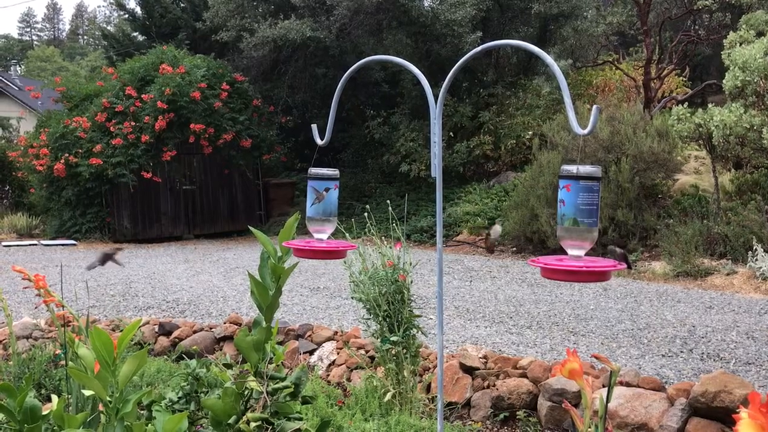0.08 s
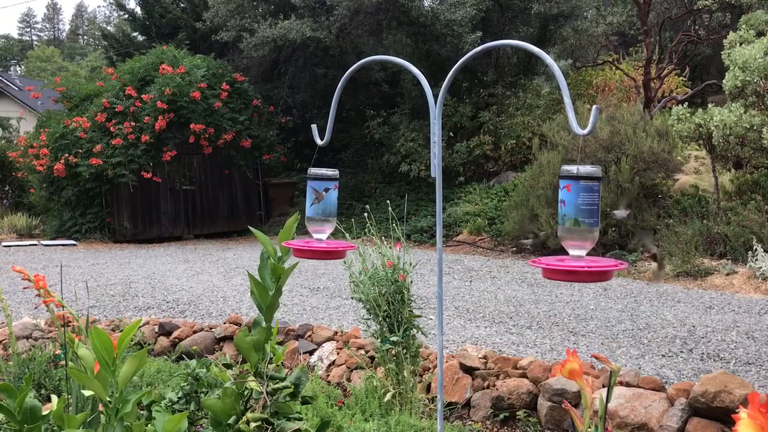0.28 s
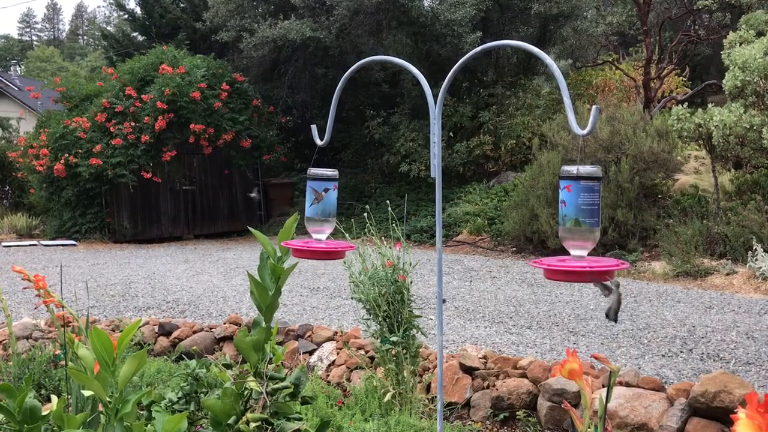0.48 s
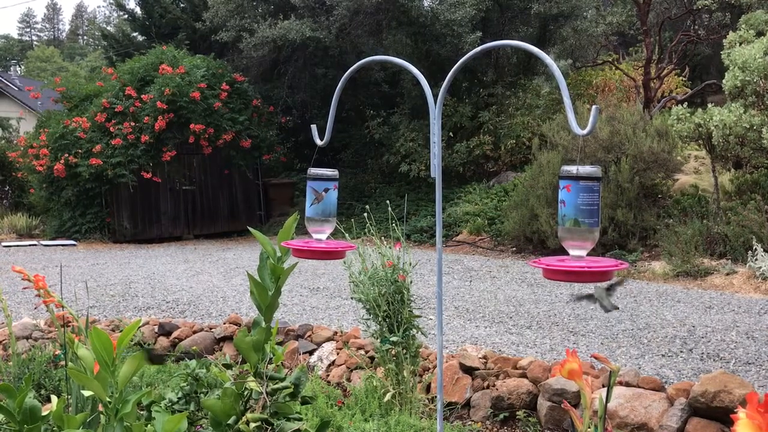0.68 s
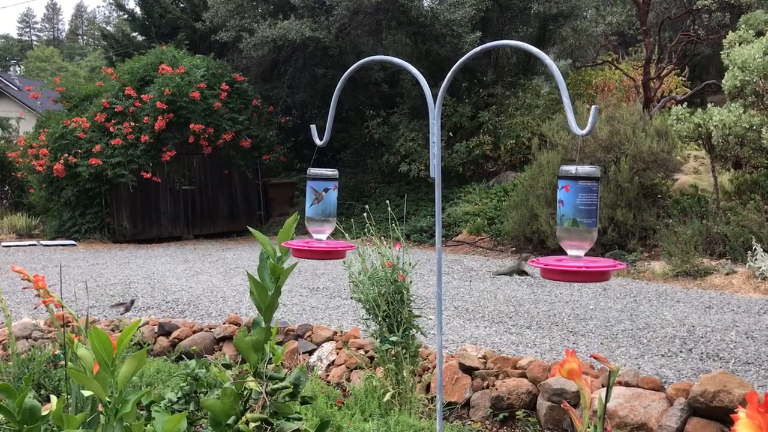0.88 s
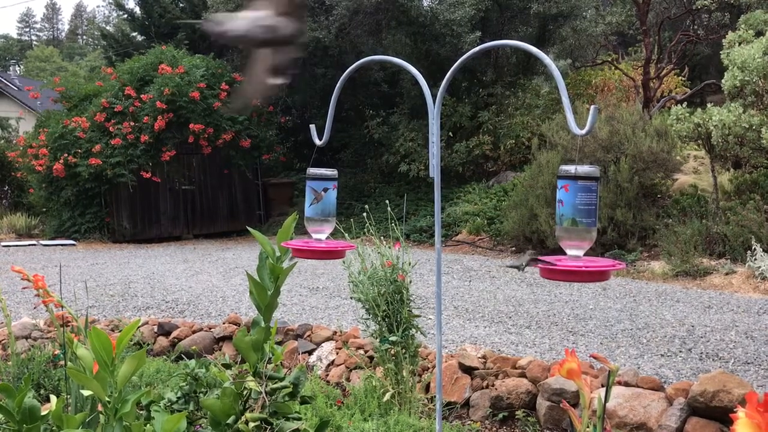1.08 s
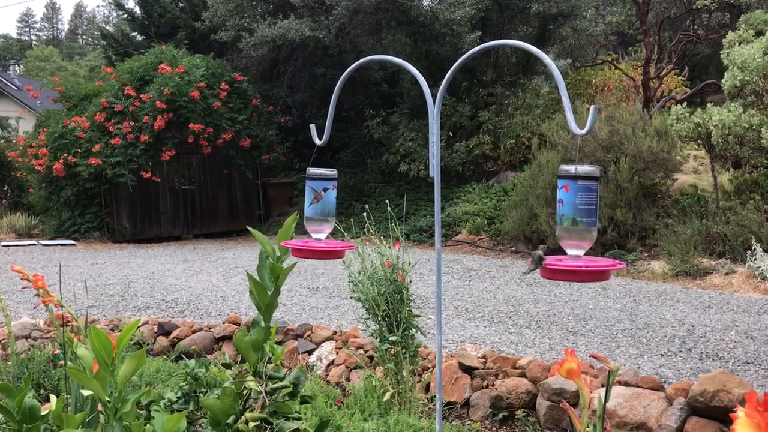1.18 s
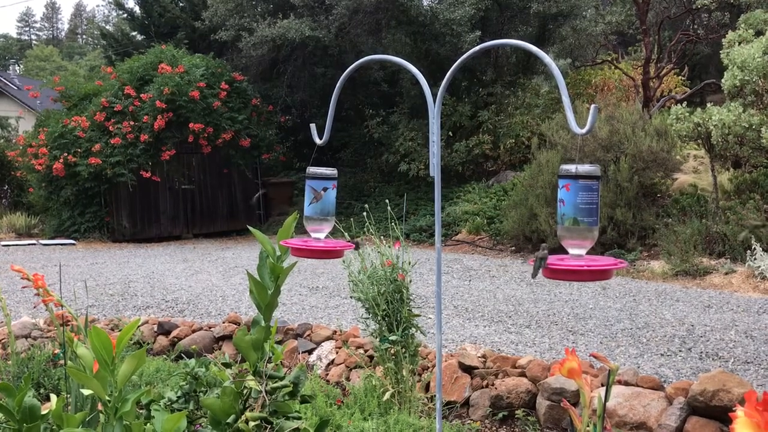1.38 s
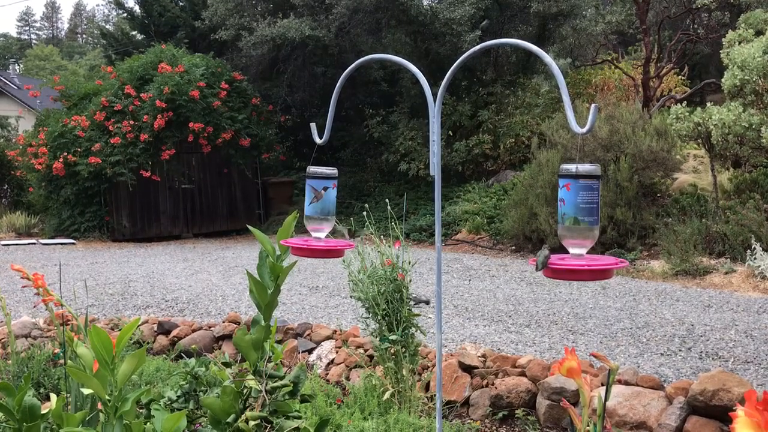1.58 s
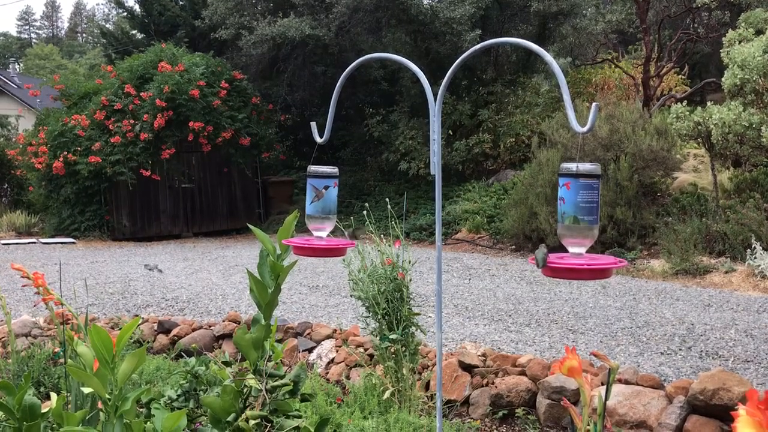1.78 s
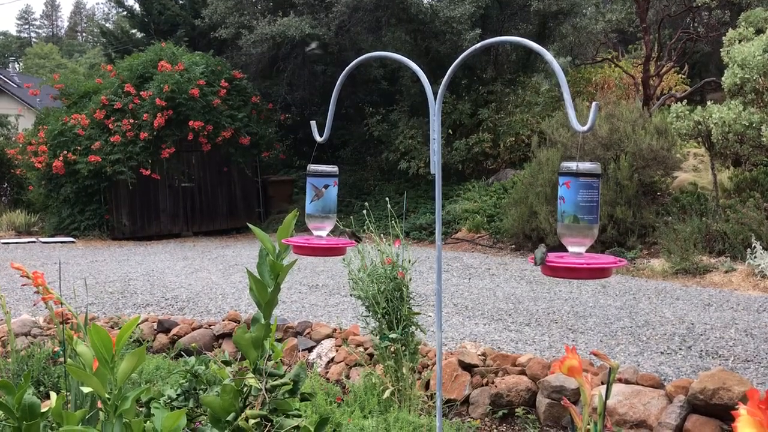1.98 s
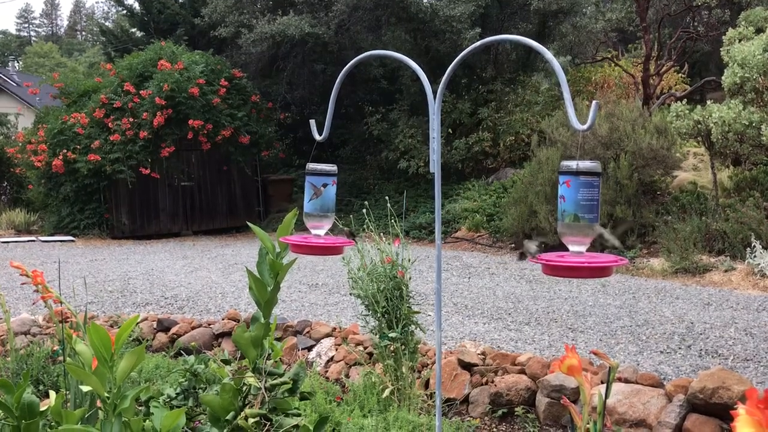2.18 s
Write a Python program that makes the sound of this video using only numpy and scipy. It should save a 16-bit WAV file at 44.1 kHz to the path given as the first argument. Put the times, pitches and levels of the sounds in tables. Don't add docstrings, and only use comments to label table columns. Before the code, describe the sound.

Hummingbirds squabble at a garden feeder, with shrill warbled chatter, dry rattles and humming wings

```python
import sys
import numpy as np
from scipy import signal
from scipy.fft import rfft, irfft, next_fast_len
from scipy.io import wavfile
from scipy.ndimage import uniform_filter1d, map_coordinates

SR = 44100
rng = np.random.default_rng(int(sys.argv[2]) if len(sys.argv) > 2 else 0)


def put_to_file(sound):
    columns = np.atleast_2d(sound).T
    safe = np.clip(columns, -1, 1)
    whole_steps = np.round(safe * 32767)
    wavfile.write(sys.argv[1], SR, whole_steps.astype(np.int16))


def ratio(d):
    e = np.asarray(d, float) / 20
    return 10 ** e


N = 97020

# (frequency [Hz], level [dB per Hz])
AIR_COLOUR = [(200, -43), (300, -5.5), (440, -19.5), (623, -19.5), (1320, -17), (4280, -22), (10500, -27),
              (15900, -28.5)]
# (time [s], level [dB], beat rate [Hz])
WING_PASSES = [(0.0, -60, 42.46), (0.15, -56.5, 41.42), (0.24, -59, 43.47), (0.32, -54.5, 46.41),
               (0.65, -48, 51), (0.81, -57.5, 49.22), (0.87, -45.5, 48), (0.91, -54.5, 47.11),
               (1.02, -45.5, 50.68), (1.06, -49, 50.07), (1.14, -43.5, 47.63), (1.21, -42.5, 46.81),
               (1.3, -57.5, 45.97), (1.6, -56.5, 41.17), (1.67, -55.5, 42.92), (1.75, -54.5, 43.04),
               (1.84, -59.5, 46.25), (2.2, -55.5, 41.5)]
# (multiple of beat rate [-], level [dB])
HUM_HARMONICS = [(1, -6.5), (2, -1), (3, -7.5), (4, -4), (5, -13.5), (6, -14), (7, -14.5), (8, -17.5),
                 (9, -19.5)]
# (frequency [Hz], level [dB per Hz])
CHURN_COLOUR = [(24, -28), (40, -17.5), (91, 2), (119, -6.5), (189, -6.5), (226, -8), (800, -34),
                (1040, -36), (1760, -120)]
# (frequency [Hz], level [dB])
FEATHER_COLOUR = [(250, -5.5), (500, -2), (1200, -4.5), (3000, -9.5), (6000, -10.5), (15000, -20)]
# (time [s], peak level [dB], pitch [Hz])
WING_KNOCKS = [
    (0.467, -38.5, 1010),
    (0.621, -54, 960),
    (0.867, -45, 1350),
    (0.989, -53, 1330),
]
# (time [s], pitch [Hz], level [dB])
WHISTLE_PATH = [
    (.2255, 7000, -64),
    (.229, 9100, -43.5),
    (.238, 9370, -31),
    (.247, 9400, -28.5),
    (.255, 9300, -37),
    (.2585, 6260, -37),
    (.2615, 6000, -39.5),
]
# (time [s], depth [Hz])
WHISTLE_NOTCHES = [
    (0.241, 686),
    (0.247, 1400),
    (0.2532, 3120),
    (0.2587, 2160),
]
# (time [s], pitch [Hz], level [dB])
CHIP_PATH = [
    (1.836, 6950, -60),
    (1.841, 7960, -40.5),
    (1.846, 7150, -31.5),
    (1.8488, 5800, -31.5),
    (1.8512, 4000, -38),
    (1.8545, 1500, -54),
]
# (first sweep [s], peak level [dB], sweep spacing [ms], sweeps [count], loudest at [share of train])
RATTLE_TRAINS = [
    (0.2784, -42.5, 4.54, 6, 0.51),
    (0.4399, -35, 5.16, 11, 0.88),
    (0.5452, -36.5, 6.1, 5, .5),
    (0.6874, -42, 7.2, 2, .5),
    (0.7072, -31.5, 5.6, 11, 0.85),
    (.795, -37, 6, 10, 0.85),
]
# (frequency [Hz], level [dB])
THROAT_COLOUR = [(1000, 5.5), (3500, -6), (5500, -3.5), (7000, -3), (9000, -8), (12000, 2.5), (16000, -4)]
# (start [s], level [dB], dip after [ms], pause on top [ms], trill length [ms])
WARBLE_CALLS = [
    (0.0951, -48, 10.2, 3.8, 16),
    (.434, -41.5, 13, 1.1, 47),
    (.626, -39.5, 10.5, 3.25, 41),
    (.807, -44, 10.2, 5.9, 11),
    (0.981, -43.5, 9, 0.089, 35),
    (1.235, -44.5, 9.9, 0.089, 48),
    (1.41, -46.5, 12, 4.5, 44),
    (1.601, -48, 12, 6, 30.5),
    (.159, -67.5, 11, 2.2, 11),
]
# (start [s], level [dB], length [s])
BUZZ_CALLS = [
    (0.902, -50, 0.028),
    (1.067, -51, 0.032),
    (1.147, -51.5, 0.043),
    (1.326, -48.5, 0.035),
    (1.517, -53.5, 0.03),
    (0.553, -41.5, .016),
]

AIR_DB = -66
NEAR_DB, NEAR_T60_S = -11, .03
ECHO_DB, ECHO_T60_S = -12, .38
CLOSE_DB = -11.5
FEATHER_DB, FEATHER_GROWS = -15.5, 0.81
SWEEP_FROM_HZ, SWEEP_TO_HZ, RISE_S = 1200, 7900, .0028
SWELL_DB, FALL_DB = 15, 14
OPEN_HZ, DIP_HZ, PEAK_HZ, DIP_WIDE_S = 8750, 5210, 9400, .004
EFFORT_HZ_PER_DB = 83.5
TRILL_TURNS_PER_DIP, TRILL_LOW_HZ, TRILL_DB = 2.55, 5800, -1.5
TOP_SAG_HZ_PER_S, LOW_SAG_HZ_PER_S, FADE_DB_PER_S = 58000, 32000, 70
LOW_LOSS_DB_PER_KHZ = 2.5
BUZZ_HZ, BUZZ_SWING_HZ, BUZZ_RATE_HZ, BUZZ_DROP_HZ = 6450, 700, 320, 1300
RASP_DB = -21
TOP_HZ = 16250


def unit(x):
    return x / np.sqrt(np.mean(x ** 2) + 1e-20)


def along(points, hz):
    f, v = np.transpose(points)
    return np.interp(np.log(np.abs(hz) + 1), np.log(f + 1), v)


def wobble(rate, size):
    knots = rng.standard_normal(int(size * rate / SR) + 4)
    return map_coordinates(knots, [np.arange(size) * rate / SR])


def coloured(x, points):
    m = next_fast_len(N + 8192)
    gain = ratio(along(points, np.fft.rfftfreq(m, 1 / SR)))
    return irfft(rfft(x, m) * gain, m)[:N]


def add(out, start, x):
    i = round(start * SR)
    out[i:i + len(x)] += x


def clock(length):
    return np.arange(int(length * SR)) / SR


def voice(hz, level_db, overtones_db, rough_db=-1.0, waver_hz=60):
    size = len(hz)
    phase = 2 * np.pi * (np.cumsum(hz + waver_hz * wobble(1495, size)) / SR + rng.random())
    tones = np.sin(phase)
    for k, db in enumerate(overtones_db, 2):
        fade = np.clip((16500 - k * hz) / 6000, 0, 1) ** 1.2
        tones = tones + ratio(db) * np.sin(k * phase) * fade
    ramp = np.arange(size)
    edge = np.minimum(np.minimum(ramp, ramp[::-1]) / 30, 1)
    return tones * ratio(level_db + rough_db * wobble(668, size)) * edge


def air():
    level = AIR_DB - 3.0 + 1.8 * wobble(3.4, N)
    return ratio(level) * unit(coloured(rng.standard_normal(N), AIR_COLOUR))


def scatter(x, delay, t60):
    t = clock(.4)
    tail = rng.standard_normal(len(t)) * ratio(-60 * t / t60)
    return signal.fftconvolve(np.pad(x, (delay, 0)), tail / np.linalg.norm(tail))[:N]


def garden(far, close):
    leaves = ratio(NEAR_DB) * scatter(far + close, 90, NEAR_T60_S)
    fences = ratio(ECHO_DB) * scatter(far + ratio(CLOSE_DB) * close, 400, ECHO_T60_S)
    return coloured(leaves + fences, [(3000, -2), (7000, -0.5), (9500, 1.5), (12000, -0.5)])


def wings():
    s, db, rate = np.transpose(WING_PASSES)
    t = np.arange(N) / SR
    level = np.interp(t, s, db)
    beat_hz = np.interp(t, s, rate) * (1 + 0.02997 * wobble(24.9, N))
    phase = 2 * np.pi * np.cumsum(beat_hz) / SR
    stroke = np.cos(2 * phase)
    hum = np.zeros(N)
    for k, gain_db in HUM_HARMONICS:
        hum += ratio(gain_db + 3.8 * wobble(22.22, N)) * np.sin(k * phase + 6.32 * rng.random())
    churn = coloured(rng.standard_normal(N) * (1 + 0.91 * stroke), CHURN_COLOUR)
    hiss = coloured(rng.standard_normal(N) * ratio(3.0 * stroke + 2.5 * wobble(90, N)), FEATHER_COLOUR)
    hiss_db = FEATHER_DB - 50 + FEATHER_GROWS * (level + 51.5)
    out = ratio(level) * unit(unit(hum) + 0.83 * unit(churn)) + ratio(hiss_db) * unit(hiss)
    u = clock(.02)
    for at, peak_db, hz in WING_KNOCKS:
        thud = 1.2 * uniform_filter1d(rng.standard_normal(len(u)), size=9)
        add(out, at, ratio(peak_db - 7 - 60 * u / .012) * (np.sin(2 * np.pi * hz * u) + thud))
    return out


def close_note(path, dips, overtones_db):
    out = np.zeros(N)
    s, pitch, db = np.transpose(path)
    t = s[0] + clock(s[-1] - s[0])
    hz = uniform_filter1d(np.interp(t, s, pitch), size=60)
    for at, depth in dips:
        hz = hz - depth * np.exp(-((t - at) / .0013) ** 2)
    add(out, s[0], voice(hz, np.interp(t, s, db), overtones_db, rough_db=.7))
    return out


def whistle():
    return close_note(WHISTLE_PATH, WHISTLE_NOTCHES, [-6, -12])


def chip():
    return close_note(CHIP_PATH, [], [-3, -13])


def rattler():
    out = np.zeros(N)
    for s, db, spacing_ms, sweeps, peak in RATTLE_TRAINS:
        for k in range(sweeps):
            late = k / (sweeps - 1)
            chance = rng.standard_normal(3)
            arch = late ** 4 * (sweeps > 3)
            t = clock(RISE_S * (1.15 + .7 * arch))
            low = SWEEP_FROM_HZ + 2400 * arch
            high = SWEEP_TO_HZ * (1 + 0.036 * chance[0])
            hz = low + (high - low) * np.sin(np.pi / 2 * t / RISE_S)
            swell = -SWELL_DB * max(peak - late, 0) - FALL_DB * max(late - peak, 0)
            level = db + swell + 0.56 * chance[1] - 6 * np.exp(-t / 0.00017)
            start = s + k * spacing_ms / 1000 + .00025 * chance[2]
            add(out, start, voice(hz, level, [-5, -6, -8], rough_db=1.5, waver_hz=486))
    return coloured(out, THROAT_COLOUR)


def buzzes():
    out = np.zeros(N)
    for s, db, length in BUZZ_CALLS:
        t = clock(length)
        turns = np.cumsum(BUZZ_RATE_HZ * (1 + 0.084 * wobble(150, len(t)))) / SR
        swing = BUZZ_SWING_HZ * np.sin(2 * np.pi * turns)
        hz = BUZZ_HZ + swing - BUZZ_DROP_HZ * np.abs(2 * t / length - .9) ** 3
        level = db - 2.0 - 9 * (2 * t / length - 1.1) ** 2 + 7 * np.sin(2 * np.pi * turns - .8)
        breath = np.convolve(rng.standard_normal(len(t)), [1, 1, -1, -1], "same")
        rasp = ratio(level + RASP_DB + 5 * t / length) * breath
        add(out, s, voice(hz, level, [-11, -14], rough_db=0.5, waver_hz=244) + rasp)
    return out


def warbler():
    out = np.zeros(N)
    for s, db, *times_ms in WARBLE_CALLS:
        at, pause, length = np.array(times_ms) / 1000
        lead = at + DIP_WIDE_S + pause
        t = clock(lead + length)
        u = np.maximum(t - lead, 0)
        trilling = t > lead
        top = np.where(t < at, OPEN_HZ - 30000 * t, PEAK_HZ) - TOP_SAG_HZ_PER_S * u
        dip = np.cos(np.pi / 2 * np.clip((t - at) / DIP_WIDE_S, -1, 1)).clip(0) ** 1.69
        dip_hz = (top - DIP_HZ - EFFORT_HZ_PER_DB * (db + 49)) * dip
        rate = TRILL_TURNS_PER_DIP / at
        turns = np.cumsum(trilling * rate * (1 + 0.047 * wobble(152, len(t)))) / SR
        trill_hz = (top - TRILL_LOW_HZ + LOW_SAG_HZ_PER_S * u) * np.sin(np.pi * turns) ** 2
        hz = top - dip_hz - trill_hz
        trill_db = TRILL_DB - LOW_LOSS_DB_PER_KHZ * np.maximum(6.8 - hz / 1000, 0)
        onset_db, ending_db = -15 * np.exp(-t / 0.0011), -12 * np.exp((u - length) / 0.0025)
        level = db + onset_db + trilling * trill_db - FADE_DB_PER_S * u + ending_db
        add(out, s, voice(hz, level, [-11], rough_db=2.0, waver_hz=150))
    return out


def scene():
    close = whistle() + chip()
    far = rattler() + buzzes() + warbler()
    return np.tile(air() + garden(far, close) + wings() + close + far, (2, 1))


def low_pass(x):
    return signal.sosfilt(signal.butter(12, 16310, fs=SR, output="sos"), x)


def record(dry):
    in_band = np.fft.rfftfreq(N, 1 / SR) < TOP_HZ
    mix = irfft(rfft(dry) * in_band, N)
    return low_pass(mix)


dry = scene()
out = record(dry)
put_to_file(out)
```